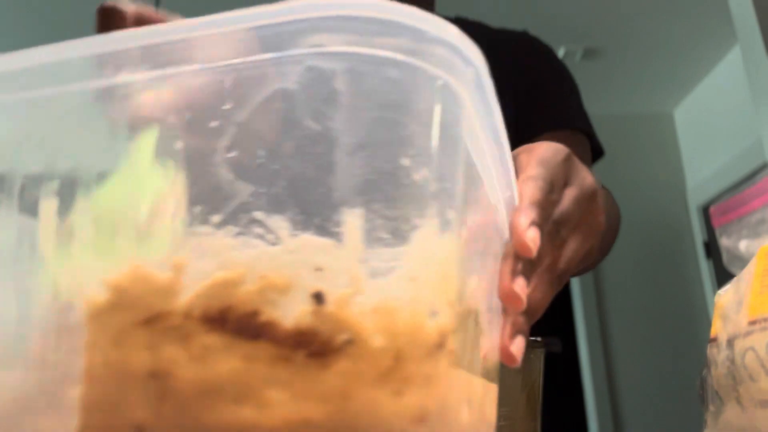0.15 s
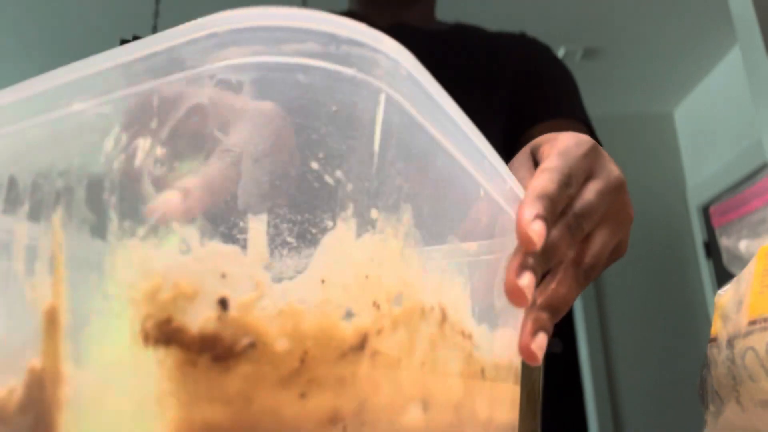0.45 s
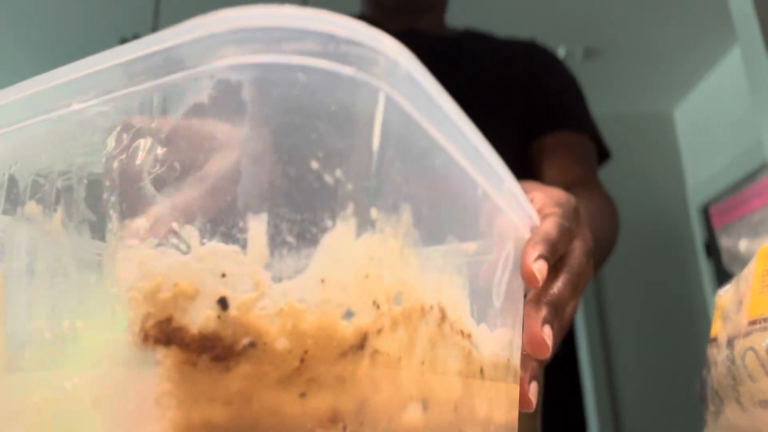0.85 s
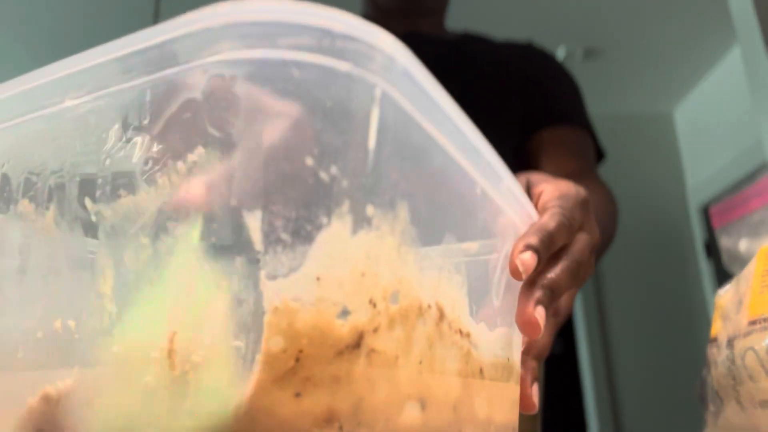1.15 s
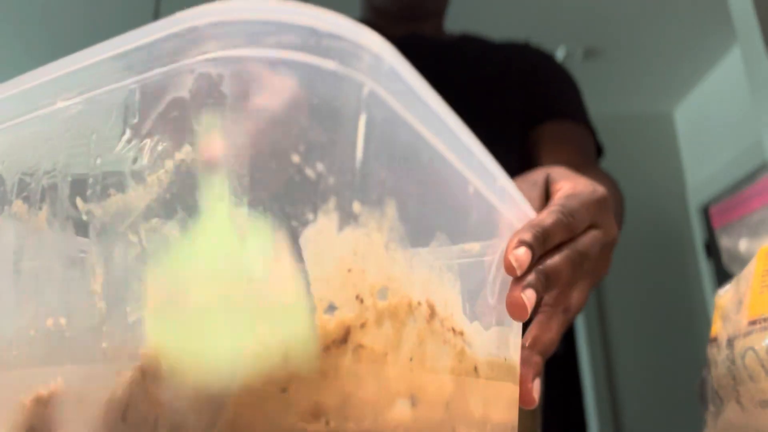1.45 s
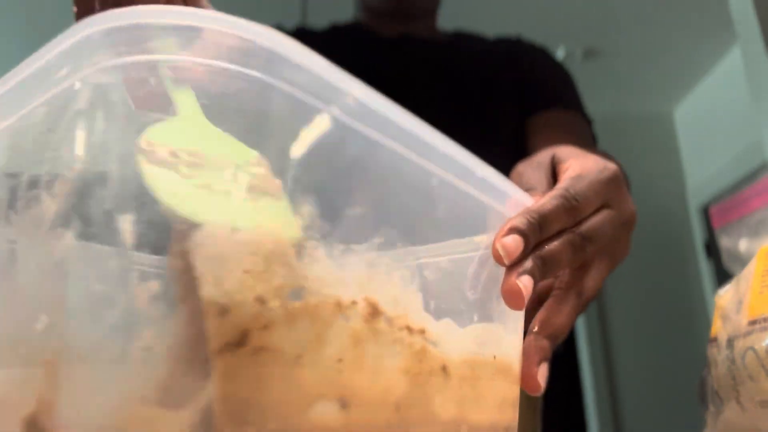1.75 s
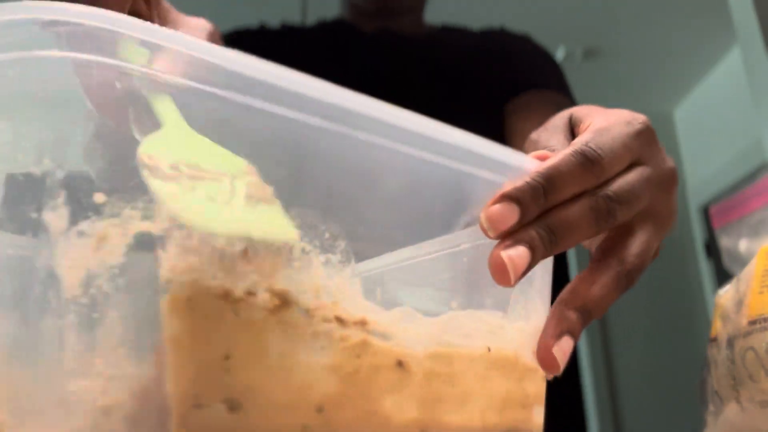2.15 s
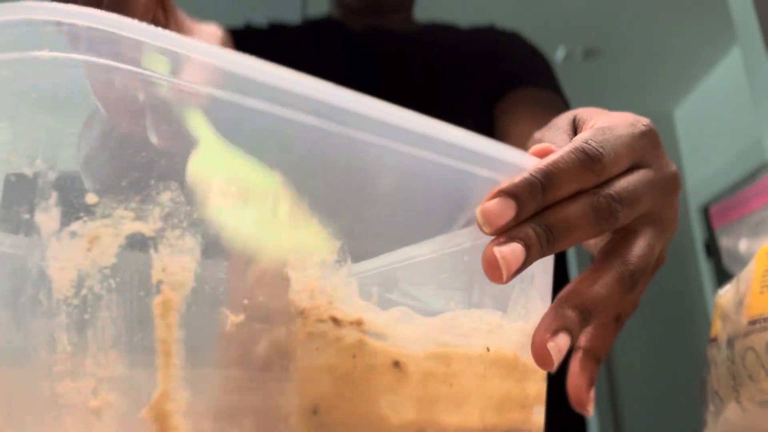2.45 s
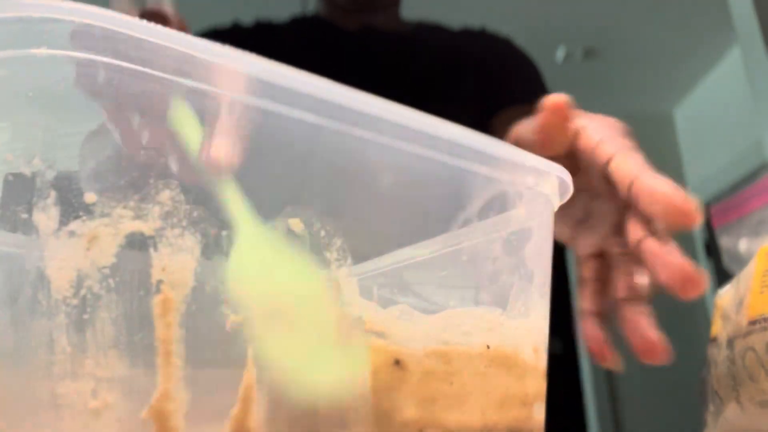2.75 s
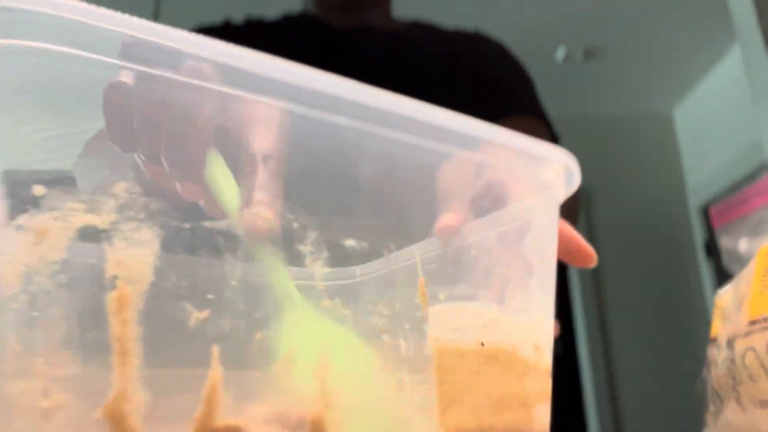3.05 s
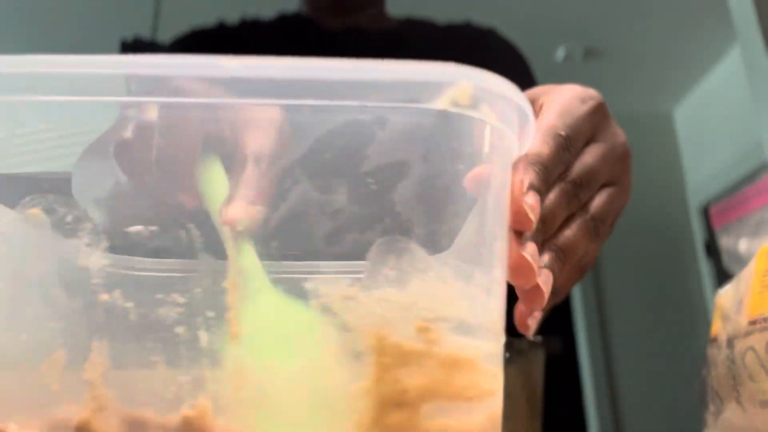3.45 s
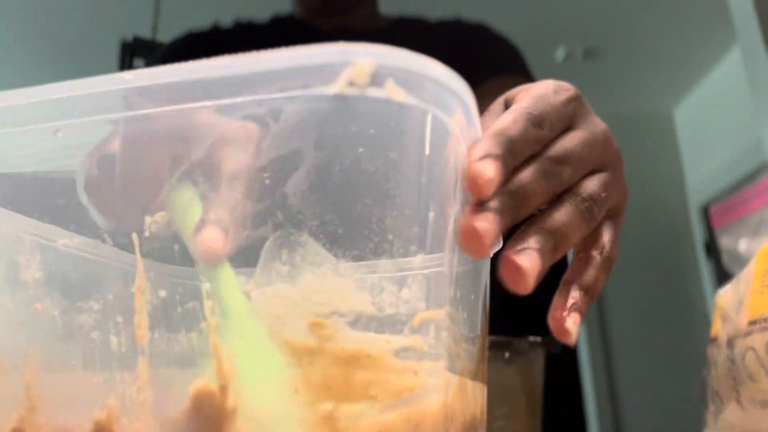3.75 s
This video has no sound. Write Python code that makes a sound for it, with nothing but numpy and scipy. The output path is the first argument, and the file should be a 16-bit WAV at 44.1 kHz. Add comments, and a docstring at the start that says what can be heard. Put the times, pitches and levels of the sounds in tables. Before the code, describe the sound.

Spatula scraping and knocking inside a plastic tub of batter, close up, over faint kitchen hum

```python
"""Scraping batter from a plastic tub

A soft spatula scrapes batter down the wall of a thin plastic tub, close to a phone's microphones.
The blade hisses and rumbles as coloured, grainy noise; its knocks ring the wall's modes, and dispersive
bending waves bring their treble first, the bass late. Thumps into the batter are damped sines, wet ticks
decaying noise bursts; a low kitchen hum and room air, both filtered noise, lie under it."""
import sys
import numpy as np
from scipy import signal
from scipy.fft import rfft, irfft, next_fast_len
from scipy.io import wavfile
from scipy.ndimage import uniform_filter1d, map_coordinates

SR = 44100
rng = np.random.default_rng(int(sys.argv[2]) if len(sys.argv) > 2 else 0)


def wav_record(signal):
    """Record a signal, one row per channel, as 16-bit PCM in the file named by sys.argv[1]."""
    frames = np.transpose(np.atleast_2d(signal))
    bounded = np.clip(frames, -1, 1)
    # unit amplitude maps onto the largest positive 16-bit level
    quanta = np.round(bounded * 32767).astype(np.int16)
    wavfile.write(sys.argv[1], SR, quanta)


N = 171990


def amp(db):
    """Amplitude ratio of a level: 20 dB for each factor of ten."""
    return 10 ** (np.asarray(db) / 20)


def unit(x):
    """Normalises a signal to unit root-mean-square."""
    return x / np.sqrt(np.mean(x ** 2) + 1e-20)


def along(points, hz):
    """Interpolates (Hz, value) points linearly on a logarithmic frequency axis."""
    point_hz, values = np.transpose(points)
    return np.interp(np.log(hz + 1), np.log(point_hz + 1), values)


def curves(rows):
    """Linear envelopes: one value per sample for each column after the time."""
    times, *columns = np.transpose(rows)
    return [np.interp(np.arange(N) / SR, times, column) for column in columns]


def wobble(rate):
    """Slow random modulation: a smooth spline through rate random knots a second."""
    knots = rng.standard_normal(int(N * rate / SR) + 4)
    return map_coordinates(knots, [np.arange(N) * rate / SR])


def filtered(x, response):
    """Linear filtering: the spectrum of x times a complex response of frequency."""
    size = next_fast_len(x.shape[-1] + 8192)  # zero padding leaves room for ringing
    spectrum = rfft(x, size) * response(np.fft.rfftfreq(size, 1 / SR))
    return irfft(spectrum, size)[..., :x.shape[-1]]


def stereo(pair):
    """Coherence: blends two versions into a wide stereo pair; frequency sets likeness, phase and balance."""
    # Each row: frequency in Hz, left-right likeness (0 to 1).
    likeness = [(100, .6), (250, .6), (700, .78), (1200, .8), (1800, .4), (2800, .45), (4500, .2),
                (6300, .35), (7900, .94), (9500, .7), (11500, .98), (13600, .75), (15000, .995)]
    # Each row: frequency in Hz, phase by which left leads in half-turns.
    phase_lead = [(1500, 0), (2500, -.4), (6500, -1), (8200, -1), (9700, -1.45), (10900, -1.97),
                  (12200, -2), (13600, -2.5), (14800, -3)]
    # Each row: frequency in Hz, left-over-right level in dB.
    balance = [(60, -.5), (200, -2), (700, .5), (1300, 0), (2400, 1), (4700, -6), (7500, -1), (10000, 0),
               (15000, 0)]
    side = np.array([[1], [-1]])

    def blend(hz):
        angle = np.arccos(np.clip(along(likeness, hz), 0, 1)) / 2
        return np.array([np.cos(angle), np.sin(angle)])

    def lean_and_turn(hz):
        gain = amp(side * along(balance, hz) / 2)
        return gain * np.exp(.5j * np.pi * side * along(phase_lead, hz))

    common, opposed = filtered(pair, blend)
    return filtered(common + side * opposed, lean_and_turn)


def tub(f, lo_hz, hi_hz, scatter_db, step=-1):
    """Modal superposition: damped resonances between two frequencies, two versions a quarter turn apart."""
    # Each row: mode frequency in Hz, resonance width in Hz, level in dB before scatter and step.
    modes = [(59, 8.4, -2), (106.7, 18.8, 1), (153, 49, -5.5), (180.3, 43.2, -0.5), (226.2, 60, -5),
             (285.3, 50, 0.5), (424, 54.7, -0.5), (527, 55, 2.5), (632, 57, -4.5), (699.4, 32, -2.5),
             (1033.6, 63.6, -2.5), (1436, 110, -16.5), (1770, 300, -18), (2450, 100, -35),
             (3256, 370, -16.5), (5160, 290, -24)]
    gains = amp(scatter_db * rng.standard_normal((len(modes), 2, 1))) * [[1], [1j]]
    total = 0
    for k, (centre, width, db) in enumerate(modes):
        if lo_hz <= centre < hi_hz:
            resonance = 1j * f * width / (centre * centre - f * f + 1j * f * width)
            # step -1 alternates the modes' signs; a positive step starts them all in step
            total = total + step ** k * gains[k] * amp(db) * resonance
    return total


def add(track, s, sound, peak_db, pan_db=0):
    """Superposition: lays a sound into the track at its peak level, split left-right by pan_db."""
    part = track[:, round(s * SR):][:, :sound.shape[1]]
    gain = amp(peak_db + np.array([[.5], [-.5]]) * pan_db)
    part += (gain * sound / np.abs(sound).max())[:, :part.shape[1]]


def grainy(rate, spread_db, share):
    """Shot noise: sparse impulses of uneven size, rate a second, mixed into white noise by power share."""
    struck = rng.random((2, N)) < rate / SR
    size = amp(spread_db * rng.exponential(size=(2, N)))
    hits = struck * size * rng.choice([-1, 1], (2, N))
    share = np.clip(share, 0, 1)
    return np.sqrt(share) * unit(hits) + np.sqrt(1 - share) * rng.standard_normal((2, N))


def patchy(x):
    """Time-frequency modulation: random gain in patches some 500 Hz wide and 23 ms long."""
    patch_db = 2.5  # rms
    spectrum = signal.stft(x, nperseg=256)[2]
    field = rng.standard_normal(spectrum.shape[1:])
    field = uniform_filter1d(field, size=3, axis=0)  # over frequency
    field = uniform_filter1d(field, size=8, axis=1)  # over time
    return signal.istft(spectrum * amp(patch_db * unit(field)), nperseg=256)[1][:, :N]


def blade_hiss():
    """Friction noise: batter tearing under the blade gives grainy noise of shifting level and tilt."""
    # Each row: time in seconds, level in dB before tilt and flutter,
    # treble gain in dB (the rest moves as far the other way).
    hiss_course = [(0, -47.5, -3.5), (.09, -46.5, 0.5), (.15, -45, -2), (.3, -52.5, -2.5), (.42, -56, 1),
                   (.45, -65, -5.5), (.65, -67, -7.5), (.69, -58, -3), (.79, -51, -2.5), (.83, -62.5, -1.5),
                   (.92, -76.5, -12), (.94, -65, -12), (1.04, -62.5, -4.5), (1.065, -46.5, -3),
                   (1.17, -49, 1), (1.2, -59, -2), (1.27, -69.5, -4.5), (1.365, -76, -11),
                   (1.385, -49.5, -1.5), (1.5, -55.5, -3.5), (1.56, -61.5, -4), (1.59, -53, -2),
                   (1.8, -49.5, -3.5), (2.07, -52, -2.5), (2.22, -56.5, -4), (2.25, -47.5, -0.5),
                   (2.3, -55, -1), (2.36, -72, -9.5), (2.45, -71, -5.5), (2.54, -62.5, -3.5),
                   (2.57, -55, -4), (2.67, -51.5, -1.5), (2.72, -62.5, -1), (2.77, -69, -4),
                   (2.8, -57.5, -4.5), (2.86, -65, -3), (2.9, -54, -2), (2.96, -48.5, -4),
                   (3.08, -52, -3.5), (3.2, -48, -1), (3.4, -50.5, -3.5), (3.66, -52.5, -4),
                   (3.79, -60, -7.5), (3.81, -70, -9), (3.9, -81, -16)]
    # Each row: frequency in Hz, gain in dB.
    hiss_colour = [(500, -30), (1500, -3), (2600, -1), (3500, 0), (5000, 0), (7000, 1.5), (10000, 0),
                   (13000, -.5), (16000, -2)]
    tilt_hz, flutter_db = 6560, 1.3
    hiss_db, tilt_db = curves(hiss_course)
    tearing = grainy(1500, spread_db=3, share=.4)
    fizz = filtered(patchy(tearing), lambda hz: amp(along(hiss_colour, hz)))
    bright = filtered(fizz, lambda hz: 1 / (1 + (tilt_hz / (hz + 1)) ** 4))
    tilted = (amp(tilt_db) * bright + amp(-tilt_db) * (fizz - bright)) / np.std(fizz)
    return stereo(amp(hiss_db + flutter_db * wobble(49)) * tilted)


def blade_drag():
    """Stick-slip excitation: the dragging blade's grainy force shakes the wall's modes."""
    # Each row: time in seconds, level in dB, level of its bass in dB (both before a random wobble),
    # left-over-right level in dB.
    drag_course = [(0.0, -45.5, -47.5, -2.5), (0.22, -47.5, -45, 1), (0.31, -45, -36.5, 4.5),
                   (0.4, -49.5, -46.5, -1), (0.69, -52.5, -47.5, 9), (0.87, -54, -46, 1),
                   (1.44, -51.5, -46, 1.5), (1.61, -46.5, -41, 1), (2.12, -45.5, -45, -1.5),
                   (2.17, -46.5, -52, 1), (2.39, -55, -42.5, 1.5), (2.56, -50, -42, -2),
                   (2.77, -52.5, -47, 3.5), (2.93, -43.5, -29, -4), (3.0, -43.5, -50.5, -2),
                   (3.32, -46.5, -46, 4.5), (3.53, -46, -46, 0), (3.9, -53.5, -44, 2.5)]
    bass_hz, edge_hz = 270, 2000  # the bass modes end; the soft blade stops exciting modes
    drag_db, bass_db, pan_db = curves(drag_course)
    slips = grainy(600, spread_db=3, share=0.45)
    wall_force = slips * amp(drag_db + 2.4 * wobble(24.99))
    belly_force = slips * amp(bass_db + 1.5 * wobble(10))
    wall = filtered(wall_force, lambda f: tub(f, bass_hz, edge_hz, 0))
    belly = filtered(belly_force, lambda f: tub(f, 0, bass_hz, 0))

    def rms_level(db):
        return np.sqrt(np.mean(amp(db) ** 2))

    rumble = rms_level(drag_db) * unit(wall) + rms_level(bass_db) * unit(belly)
    return amp(np.array([[.5], [-.5]]) * pan_db) * stereo(rumble)


def kitchen():
    """Stationary noise: filtered noise is the room air, narrow bands of noise a wavering low hum."""
    # Each row: frequency in Hz, relative level in dB.
    air_colour = [(18, -7), (30, 7.5), (263, -7.5), (341, 6.5), (787, -56), (945, -17.5), (1260, -27),
                  (1870, -51), (2020, -76), (14000, -66), (15500, -88)]
    # Each row: frequency in Hz, distance to half amplitude in Hz, rms level in dB.
    hum_bands = [(55, 7, -39), (131.2, 15.5, -49.5)]
    air = filtered(rng.standard_normal((2, N)), lambda hz: amp(along(air_colour, hz)))
    bed = amp(-50.5) * unit(air)
    for centre, width, db in hum_bands:
        hum = filtered(rng.standard_normal((2, N)), lambda f: 1 / (1 + ((f - centre) / width) ** 2))
        bed = bed + amp(db) * unit(hum)
    return stereo(bed)


def ticks():
    """Sudden release: the wet blade snaps free in short bright bursts of exponentially decaying noise."""
    # Each row: start in seconds, peak level in dB, 60 dB decay time in seconds.
    tick_events = [(0.0625, -33.5, 0.022), (0.1191, -24.5, 0.035), (0.368, -42, 0.025),
                   (0.3866, -38.5, 0.05), (0.4585, -37, 0.039), (0.4902, -49, 0.037), (0.5116, -42, 0.024),
                   (0.548, -44, 0.028), (0.9303, -23, 0.018), (1.056, -45, 0.03), (1.076, -31, 0.045),
                   (1.3757, -48, 0.03), (1.387, -41.5, 0.12), (1.711, -34, 0.1), (1.8414, -36, 0.038),
                   (2.2405, -27.5, 0.05), (2.65, -39, 0.069), (3.3097, -28.5, 0.091)]
    # Each row: frequency in Hz, gain in dB.
    tick_colour = [(300, -21), (1000, 7), (3000, 2), (6000, 10.5), (10000, 8), (13000, 9), (16000, 6)]
    rise_s = .0006
    out, t = np.zeros((2, N)), np.arange(SR // 8) / SR
    for s, db, t60 in tick_events:
        noise = filtered(rng.standard_normal((2, len(t))), lambda hz: amp(along(tick_colour, hz)))
        add(out, s, noise * (1 - np.exp(-t / rise_s)) * amp(-60 * t / t60), db)
    return stereo(out)


def strike(out, s, force, db, belly_db, low_db, top_db, edge_db, pan_db):
    """Bending-wave dispersion: a force rings the tub's modes, low ones late, lag falling as 1 / sqrt(Hz)."""
    # Edges in Hz of the belly, low, middle, top and edge groups of modes.
    group_edges = [0, 215, 350, 800, 1250, 6000]
    stiff_hz = 880  # above this the wall carries all waves at one speed, with no lag
    bending_s = 0.002574  # 1 / sqrt(Hz) lag scaled at 1 kHz, before the lag at stiff_hz is taken off
    soft_over = 1.27  # the soft tip's cutoff over each group's upper edge

    def dispersion(f):
        slow = np.minimum(f, stiff_hz)
        lag_integral = 2 * np.sqrt(slow) - slow / np.sqrt(stiff_hz)
        return np.exp(-2j * np.pi * bending_s * np.sqrt(1000) * lag_integral)

    over = (belly_db, low_db, 0, top_db, edge_db)
    for lo, hi, over_db in zip(group_edges, group_edges[1:], over):
        def response(f):
            soft_tip = 1 / (1 + 1j * f / (soft_over * hi)) ** 4
            return tub(f, lo, hi, scatter_db=1.94, step=0.91) * dispersion(f) * soft_tip

        add(out, s, stereo(filtered(force, response)), db + over_db, pan_db)


def scuffs():
    """Repeated impact: the blade stutters on the wall in a swell of uneven small blows."""
    # Each row: start in seconds, length in seconds, peak level of the middle modes in dB, then over it
    # in dB the belly, low, top and edge modes, and the left-over-right level in dB.
    scuff_events = [(0.064, 0.041, -44.5, 0, -10, 7.5, 3.5, 0), (0.134, 0.036, -39, -19, -11, 3.5, -21, 2),
                    (.31, 0.022, -33, -20, -3.5, -6.5, -16, 1),
                    (0.702, 0.076, -36, -12, -3.5, -8.5, -17, 5), (.93, 0.003, -34, -5, -18, -2.5, -17, -3),
                    (1.041, 0.078, -26.5, 1.5, -1.5, -12.5, -23, 1.5),
                    (1.115, 0.074, -35.5, 2, -3, -4.5, -16, 0), (1.409, 0.013, -35, 3.5, 5, -6, -30, -5),
                    (2.188, 0.032, -31, 1, -22, -12.5, -26, -4),
                    (2.545, 0.057, -28, 5, 3, -16.5, -39, -4.5),
                    (2.6, 0.075, -37.5, 4.5, -4, -4.5, -34, -7), (2.885, 0.037, -31, 10, 10, -23, -23, -6),
                    (2.929, 0.057, -28.5, -8, -21, -8, -17, 0), (3.24, 0.095, -31, -19, -0.5, -10, -35, -7),
                    (3.7, 0.083, -39.5, 5, 3, -10, -33, 0)]
    stutters_per_s, spread_db = 900, 3
    out, t = np.zeros((2, N)), np.arange(8000) / SR
    for s, length, *levels in scuff_events:
        struck = rng.random(len(t)) < stutters_per_s / SR
        size = amp(spread_db * rng.standard_normal(len(t)))
        stutter = struck * size * rng.choice([-1, 1], len(t))
        swell = np.sqrt(np.abs(np.sin(np.pi * np.clip(t / length, 0, 1))))
        force = swell * (stutter + 0.033 * rng.standard_normal(len(t)))
        strike(out, s, np.ones((2, 1)) * force, *levels)
    return out


def knocks():
    """Impulse response: single blows on the wall, each with a decaying chatter of the tip."""
    # Each row: time in seconds, peak level of the middle modes in dB, then over it in dB
    # the belly, low, top and edge modes, and the left-over-right level in dB.
    knock_events = [(0.121, -33.5, -19, -17, 1.5, -14, 4), (0.238, -22.5, -3.5, 0.5, -16, -34, 2.5),
                    (0.46, -34.5, -8, -9, -6, -16, 1), (0.512, -38, -14, -5, -3.5, -24, -4),
                    (0.653, -20, -5.5, 4, -18.5, -45, 4.5), (0.995, -16, -1, -3, -10, -27, 2.5),
                    (1.373, -44, 3, -11, -20, -20, 12), (1.392, -23.5, -11.5, -9.5, -19, -40, -1),
                    (1.403, -23, -1.5, -12, -4, -36, 4), (1.712, -15.5, 0.5, -5.5, -7.5, -8.5, 1.5),
                    (1.842, -32, -8, -6, -5.5, -26, -5.5), (2.007, -28.5, 3.5, -3.5, -13, -38, 5),
                    (2.163, -21, 5, -31, -13.5, -41, -7), (2.238, -29, 2.5, -26, -8.5, -8, -6),
                    (2.806, -35.5, -8, -9, -13, -22, -8), (3.272, -27.5, 9, -1.5, -25, -32, -7),
                    (3.294, -19.5, -4.5, -27, -30, -28, -6), (3.309, -12.5, -11.5, -23, -10.5, -16, -2),
                    (3.315, -18.5, 2, -5.5, -2.5, -23, -5), (3.64, -12, -4.5, -24, -17.5, -48, 0.5),
                    (3.666, -10.5, -4, -20, -15.5, -29, 2), (3.745, -44.5, -3, -2, 10, -33, 0.5)]
    chatter_db, chatter_t60 = -14, .014  # dB relative to the blow, seconds
    lead = 100  # samples of silence ahead of the blow
    out, t = np.zeros((2, N)), np.arange(8000) / SR
    for s, *levels in knock_events:
        chatter = amp(chatter_db - 60 * t / chatter_t60) * rng.standard_normal(len(t))
        force = np.roll((t == 0) + chatter, lead)
        strike(out, s - lead / SR, np.ones((2, 1)) * force, *levels)
    return out


def thumps():
    """Damped oscillation: a soft push sets the batter-loaded wall swinging for a few cycles."""
    # Each row: start in seconds, peak level in dB, pitch in Hz, 60 dB decay time in seconds,
    # left-over-right level in dB.
    thump_events = [(0.293, -20, 96, 0.042, 9), (0.656, -22.5, 105, 0.015, 14), (0.714, -33.5, 117, 0.1, 5),
                    (0.796, -32, 91, 0.099, 5), (1.044, -20, 86.7, 0.15, 4), (1.443, -25, 70.6, 0.13, 8),
                    (1.727, -22, 55, 0.072, -11), (1.906, -32, 98, 0.12, 5), (2.011, -25, 66.5, 0.083, 1),
                    (2.198, -28, 158, 0.076, -11), (2.526, -32.5, 121.5, 0.079, -13),
                    (2.677, -24.5, 86, 0.043, 2), (2.918, -19.5, 108.4, 0.077, -10),
                    (2.942, -16, 115, 0.052, -6), (3.319, -27, 104, 0.046, -1)]
    rise_s = 0.0059
    out, t = np.zeros((2, N)), np.arange(SR // 4) / SR
    for s, db, hz, t60, pan_db in thump_events:
        shape = (1 - np.exp(-t / rise_s)) ** 2 * amp(-60 * t / t60)
        phase = rng.normal(0, 0.35, (2, 1))  # radians, one for each channel
        add(out, s, shape * np.sin(2 * np.pi * hz * t + phase), db, pan_db)
    return out


def room(x):
    """Diffuse reverberation: noise in which each frequency dies at its own speed answers the sound."""
    # Each row: frequency in Hz, 60 dB decay time in seconds.
    decay_times = [(200, 0.31), (2000, 0.18), (10000, 0.25)]
    hz, t, spectrum = signal.stft(rng.standard_normal((2, SR // 3)), SR, nperseg=256)
    decay = amp(-60 * t / along(decay_times, hz)[:, None])
    tail = signal.istft(spectrum * decay, SR, nperseg=256)[1]
    tail = tail / np.linalg.norm(tail[0])  # unit energy
    return stereo(signal.fftconvolve(x.mean(0)[None], tail, axes=1)[:, :N])


def scene():
    """Superposition: the blows and their reverberation, the scrape and the kitchen."""
    hits = ticks() + scuffs() + knocks() + thumps()
    scrape = blade_hiss() + blade_drag()
    return hits + amp(-9) * room(hits) + scrape + kitchen()


def record(dry):
    """Band limiting: three high-pass stages thin the phone's deepest bass; nothing passes the top limit."""
    low_cut_hz, top_hz = 42, 15850  # corner of each stage, top limit
    return filtered(dry, lambda hz: (1j * hz / (1j * hz + low_cut_hz)) ** 3 * (hz < top_hz))


dry = scene()
out = record(dry)
wav_record(out)
```